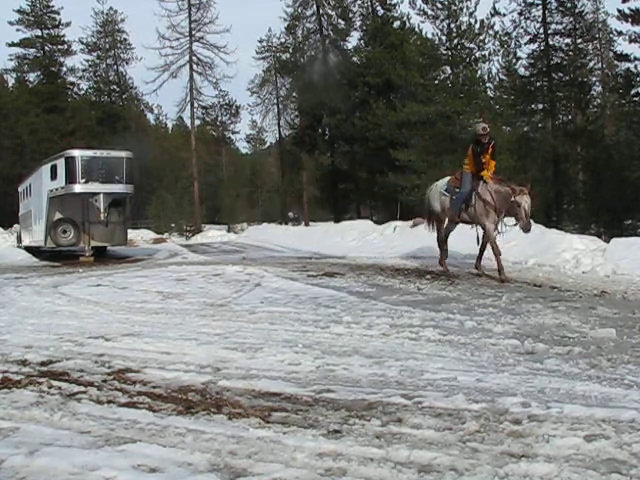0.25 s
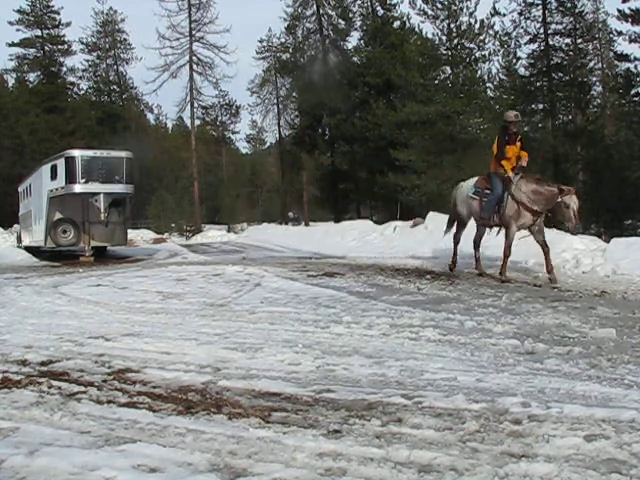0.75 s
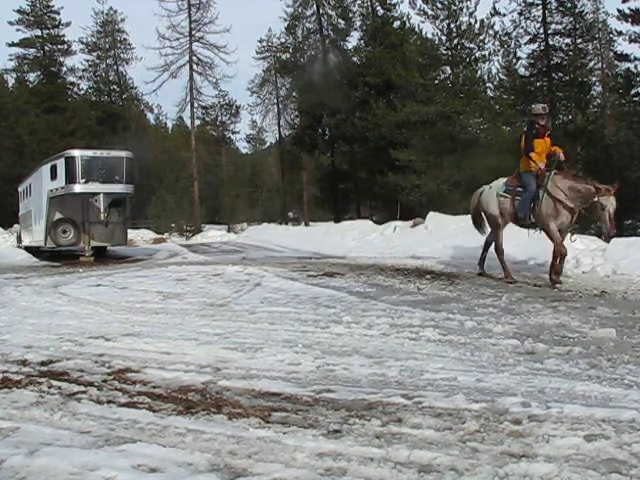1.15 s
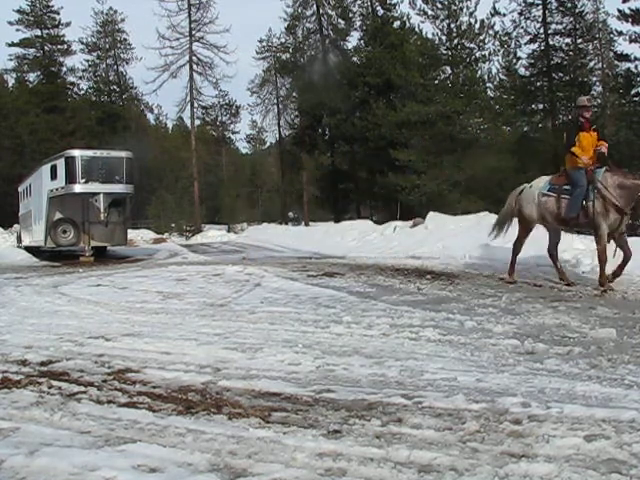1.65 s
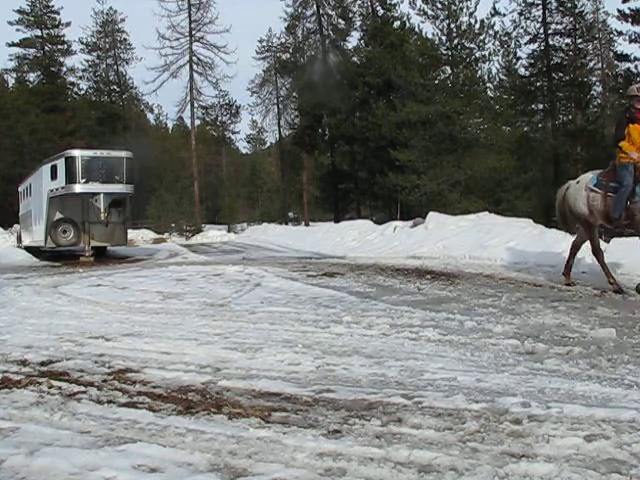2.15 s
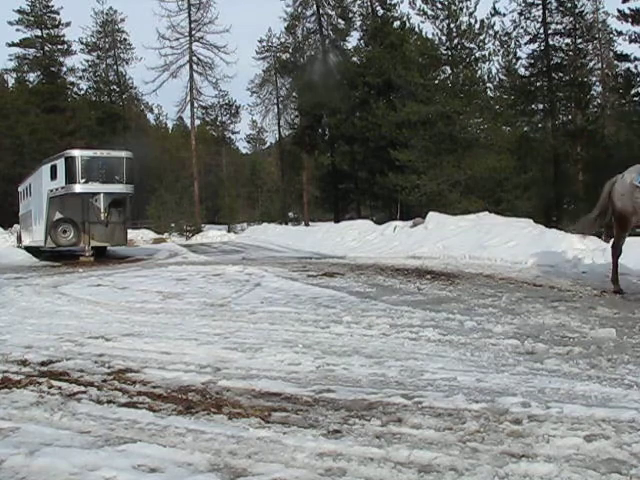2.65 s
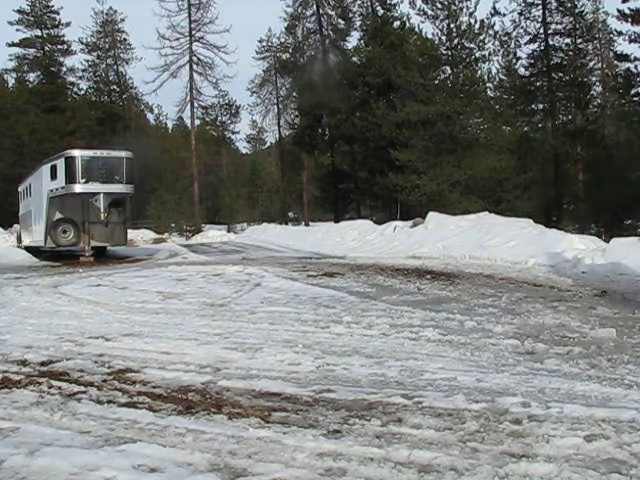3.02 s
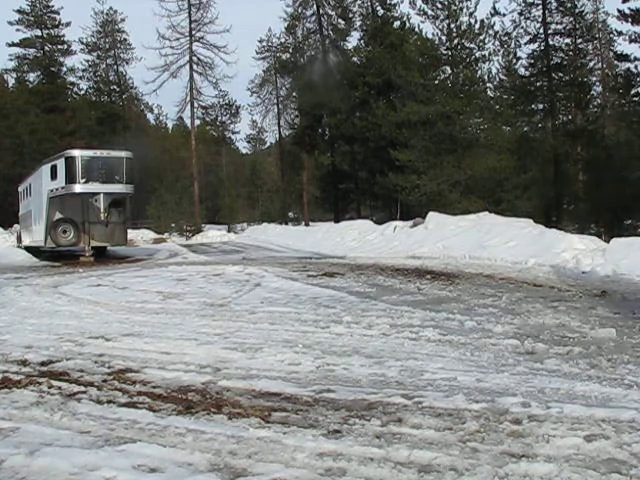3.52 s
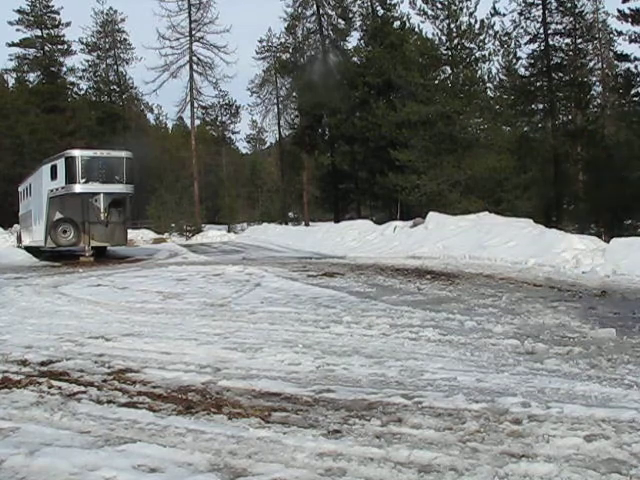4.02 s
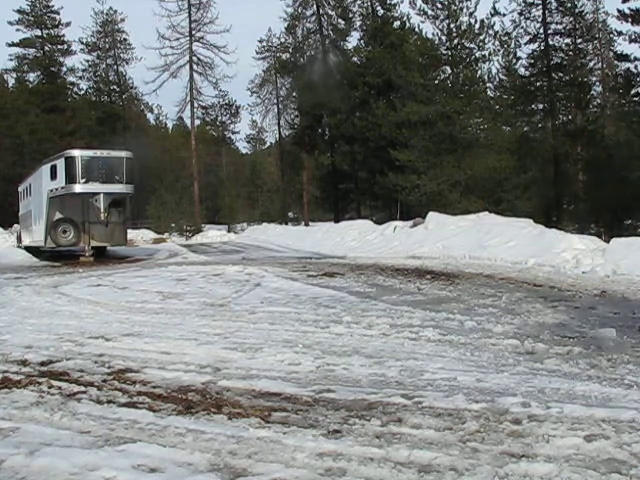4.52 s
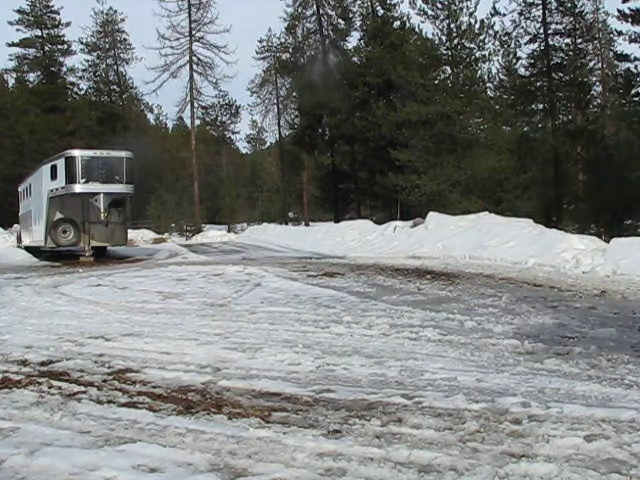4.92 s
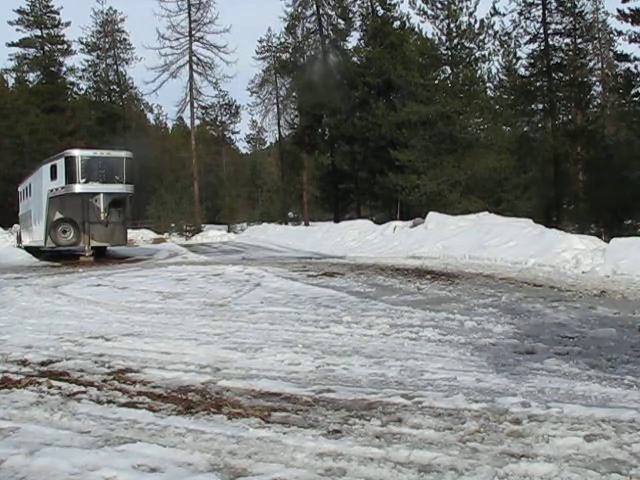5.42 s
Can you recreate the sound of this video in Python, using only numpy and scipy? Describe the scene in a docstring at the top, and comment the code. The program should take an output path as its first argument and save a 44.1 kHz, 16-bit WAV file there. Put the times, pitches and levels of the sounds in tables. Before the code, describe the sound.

A horse walks on icy, crusted snow in a forest clearing. A hard crack and knock open, another sharp one follows at once, then lighter crunches and sparse snaps. From the middle on, the steps grow denser and grainier, with hollow thuds under the crust and pattering ice chips. A stereo camera microphone hears them slightly to the right, dry with faint short echoes, over soft air hush.

```python
"""In a forest clearing, a horse walks over crusted, icy snow to the right of a camera.
Each step is built from shaped bands of breaking ice grains, ringing snaps of the crust, dull knocks
of the hoof and hollow drumming under the crust; chips of ice patter throughout.
Short decaying noise tails give the faint echoes of ruts, banks and trunks.
Behind it lie the hush of the open air and a low rumble, both of filtered noise."""
import sys
import numpy as np
from scipy import signal
from scipy.fft import rfft, irfft, next_fast_len
from scipy.io import wavfile
from scipy.ndimage import map_coordinates

SR = 44100
rng = np.random.default_rng(int(sys.argv[2]) if len(sys.argv) > 2 else 0)


def generate_wav(signal):
    """Clip the signal to [-1, 1] and save it as 16-bit WAV at the path in sys.argv[1]."""
    frames = np.transpose(np.atleast_2d(signal))
    scaled = np.clip(frames, -1, 1) * 32767
    pcm = np.round(scaled).astype(np.int16)
    wavfile.write(sys.argv[1], SR, pcm)


N = 250002

# colour of crackling ice grains, for crunch and chips: (pitch_hz, gain_db)
CRACKLE_COLOUR = [(1100, -10.5), (1700, -1), (3000, -3.5), (5000, -9.5), (6500, -9.5), (8500, -19.5)]


def amp(db):
    """Amplitude of a level in dB."""
    return 10 ** (np.asarray(db) / 20)


def unit(x):
    """x scaled to rms 1."""
    return x / np.sqrt(np.mean(x ** 2) + 1e-20)


def along(points, hz):
    """Read a curve of (Hz, value) points on a log frequency axis; -120 below the first point."""
    f, v = np.transpose(points)
    return np.interp(np.log(hz + 1), np.log(f + 1), v, -120, v[-1])


def coloured(x, points):
    """Pass x through the minimum-phase filter with the given (Hz, dB) gain, then set rms to 1."""
    m = 2 * next_fast_len(N // 2 + SR // 4)
    gain = amp(along(points, np.fft.rfftfreq(m, 1 / SR)))
    cepstrum = irfft(np.log(gain + 1e-6), m)
    # folding the cepstrum forward in time makes the filter causal
    cepstrum[1:m // 2] *= 2
    cepstrum[m // 2 + 1:] = 0
    filtered = irfft(rfft(x, m) * np.exp(rfft(cepstrum)), m)
    return unit(filtered[..., :N])


def highpass(x, order, hz):
    """Causal Butterworth high-pass."""
    return signal.sosfilt(signal.butter(order, hz, "high", fs=SR, output="sos"), x)


def add(out, s, rise_ms, wave):
    """Mix a wave into out under a short swell that peaks at s and dies in a few rise times."""
    rise = max(rise_ms, .1) / 1000 * SR
    u = np.arange(len(wave)) / rise
    start = round(s * SR - rise)
    shaped = wave * u * np.exp(1 - u)
    out[max(start, 0):start + len(wave)] += shaped[max(-start, 0):]


def ringing(modes, hz, detune_spread, t):
    """Sum the sine modes of a struck body, each slightly and randomly off its nominal pitch."""
    detune = rng.normal(0, detune_spread, len(modes))
    return sum(amp(db) * np.sin(2 * np.pi * hz * ratio * (1 + d) * t)
               for (ratio, db), d in zip(modes, detune))


def grains(per_s, spread_db):
    """Ice grains breaking at random moments: many small, a few large."""
    when, size, sign = rng.random((3, N))
    size_db = np.minimum(-spread_db * np.log(1 - size), 13)
    return unit((when < per_s / SR) * amp(size_db) * np.sign(sign - .5))


def swell(t, rise_ms, fall_ms):
    """A rounded rise and fall of power about t = 0."""
    side_ms = np.where(t < 0, max(rise_ms, 1), max(fall_ms, 1))
    return np.exp(-2 * np.abs(1000 * t / side_ms) ** 1.53)


def slips(per_s, depth_db):
    """The snow gives way in fits and starts: a gain that wanders quickly."""
    knots = rng.standard_normal(int(N * per_s / SR) + 4)
    wander = map_coordinates(knots, [np.arange(N) * per_s / SR])
    return unit(amp(depth_db * wander))


def balance(db, weight_db, spray_db):
    """Power of thud, crush, crackle and spray; heavier weight deepens the mix."""
    # weight_db sets the crush relative to the crackle, and the thud follows it more steeply
    thud_db, thud_grows = -3.5, 1.4
    return amp(db + np.array([[thud_db + thud_grows * weight_db], [weight_db], [0], [spray_db]])) ** 2


def pressure():
    """How hard the hooves work the snow, as amplitude in four bands that slip partly together."""
    # hooves stamping down, sudden and then dying; weight and spray are relative to crackle:
    # (peak_s, crackle_db, fall_ms, weight_db, spray_db)
    stamps = [(0.002, -34, 3.7, 12.5, -31), (0.054, -41.5, 11, 5.5, 4), (0.187, -49, 21, -6, -1),
              (0.259, -22, 3.8, -3.5, -21), (0.455, -34.5, 5.4, -0.5, -1.5), (0.478, -42, 18, -1.5, 0),
              (0.938, -40.5, 14, 1, -1), (1.199, -39, 28, 0, -19), (1.474, -40, 6.4, -1.5, -10),
              (1.745, -39, 27, -11, 1), (1.961, -38, 11, -3.5, -2), (1.984, -47.5, 31, 4, -6),
              (2.039, -39, 23, -2, -16), (2.279, -35, 5, -25, 6.5), (2.327, -32.5, 26, -8, 0.5),
              (2.391, -38, 23, -9.5, 1), (2.419, -30.5, 83, -6, 1), (2.537, -30, 13, -2.5, -4),
              (2.817, -27, 6.8, -3, -21), (2.999, -27, 28, -3.5, 3), (3.376, -28, 5.9, -6, -6),
              (3.435, -40, 7.8, -0.5, -16), (3.552, -31, 48, -5, 2.5), (3.772, -41.5, 16, -6, 6),
              (3.79, -29.5, 43, -4.5, 1), (4.031, -27.5, 58, -5, 2.5), (4.291, -29, 14, -8, 1),
              (4.347, -31.5, 27, 0.5, 2), (4.545, -39, 38, -4.5, -20), (4.644, -39, 25, -10, 5.8),
              (4.778, -36.5, 48, -1, -3.5), (4.878, -28.5, 92, -3, -5), (4.898, -24.5, 13, 3, -3),
              (5.123, -33.5, 16, -6, -3.5), (5.289, -33, 11, -3, -0.5), (5.336, -35, 35, 3.5, -22)]
    # hooves sinking or dragging, swelling and fading; half length is the mean of rise and fall:
    # (peak_s, crackle_db, half_length_ms, weight_db, spray_db)
    drags = [(0.026, -71, 16, 6, -27), (0.286, -32.5, 21, -3.5, 1.5), (0.373, -52.5, 27, -3, 0),
             (0.59, -40, 32, -6.5, 1), (0.665, -56, 19, -14, 6.5), (0.73, -41, 17, -20, 2.5),
             (0.839, -36.5, 26.4, -4.5, -1), (0.999, -51, 12, 2.5, 4), (1.146, -33.5, 22.4, -9.5, 3.5),
             (1.192, -34.5, 10.4, -7, -1), (1.393, -31, 27.5, -8, 0), (1.523, -42.5, 16, -1.5, -3),
             (1.644, -34, 17.4, -7.5, -4), (1.69, -44.5, 26, -3, 2.5), (1.827, -38, 27, -20, 4),
             (1.904, -34.5, 23.5, -5.5, 3), (2.164, -42.5, 9.8, -14, 2), (2.21, -34.5, 20, -7, 1),
             (2.5, -34.5, 46, -5, -1), (2.562, -33.5, 15.5, -1, -6), (2.731, -34.5, 32, -8, -1),
             (2.904, -42.5, 31, -22, 1.5), (3.065, -36, 33, -4, 0.5), (3.178, -37.5, 28, -5.5, -8),
             (3.302, -29, 34, -11, -9.5), (3.663, -36, 17, -1, -25), (3.712, -31, 25, -1.5, -28),
             (3.866, -29.5, 25, -6, -24), (3.936, -41.5, 50, -10, -20), (4.003, -33.5, 29, -17, 1),
             (4.085, -31.5, 54, -3, -10), (4.17, -40.5, 50, 2, -25), (4.421, -42.5, 65, -1.5, -25),
             (4.504, -36.5, 16, -7, -5), (4.665, -34, 17, -4, -3), (4.709, -38, 13.4, -0.5, -3),
             (4.825, -37.5, 37, -1, -8), (5.144, -37.5, 10.6, -2.5, -4), (5.229, -29, 17.5, -6.5, 3.5),
             (5.44, -34.5, 13.7, -4.5, 1), (5.516, -33.5, 18.3, -11, -4.5), (5.65, -44, 35, -7, -8)]
    # faint rustle of snow, heard between the steps: (time_s, crackle_db)
    rustle = [(0, -77), (0.9, -56), (1.1, -64), (1.28, -50.5), (1.9, -54), (2.1, -53.5), (2.63, -50),
              (2.95, -58), (3.35, -46), (3.5, -53), (4.3, -43.5), (4.6, -55), (5.05, -52), (5.3, -52.5),
              (5.67, -51.5)]
    stamp_rise_ms, settle_db, settle_ms = 3, -20.5, 39  # loosened snow settles after each stamp
    lingers = np.sqrt(1.13)  # a drag falls a little more slowly than it rises

    t = np.arange(-SR // 4, SR // 2) / SR
    rustle_db = np.interp(np.arange(N) / SR, *np.transpose(rustle))
    power = balance(rustle_db, weight_db=-3.5, spray_db=0.5)
    swells = [(s, db, stamp_rise_ms, ms, *mix) for s, db, ms, *mix in stamps]
    swells += [(s, db + settle_db, stamp_rise_ms, ms + settle_ms, *mix) for s, db, ms, *mix in stamps]
    swells += [(s, db, ms / lingers, ms * lingers, *mix) for s, db, ms, *mix in drags]
    for s, db, rise_ms, fall_ms, weight_db, spray_db in swells:
        at = np.arange(len(t)) + round(s * SR) - SR // 4
        inside = (at >= 0) & (at < N)
        power[:, at[inside]] += balance(db, weight_db, spray_db) * swell(t, rise_ms, fall_ms)[inside]
    together = slips(per_s=45, depth_db=1.66)
    return np.array([together * np.sqrt(p) * slips(per_s=76, depth_db=1.5) for p in power])


def crunches(levels):
    """The same breaking grains sound in all four bands, on a bed of grains too fine to tell apart."""
    # low thump of the packed snow: (pitch_hz, gain_db)
    thud_colour = [(50, -58), (110, -6.5), (250, 1.5), (420, 3), (600, -22)]
    # grainy snow crushed under the hoof: (pitch_hz, gain_db)
    crush_colour = [(300, -2.5), (500, 8), (900, 8), (1400, 3.5), (2000, -37.5)]
    # fine spray kicked up: (pitch_hz, gain_db)
    spray_colour = [(2500, -29.5), (4500, -0.5), (7000, 6.5), (10000, 2.5), (13000, 4), (16000, -3.5)]

    coarse = grains(per_s=600, spread_db=4.0)
    fine = grains(per_s=5000, spread_db=2.5)
    # colour, then shares of coarse and fine grains
    mixes = [(thud_colour, .9, .4), (crush_colour, .8, .5), (CRACKLE_COLOUR, .6, .8), (spray_colour, .3, .9)]
    bands = []
    for colour, coarse_share, fine_share in mixes:
        bed = 0.5 * rng.standard_normal(N)
        bands.append(coloured(coarse_share * coarse + fine_share * fine + bed, colour))
    return np.sum(levels * bands, axis=0)


def cracks():
    """A snap rings the ice plate for a few cycles, with a bright tick at the break."""
    # the ice crust snapping; level_db sets the ring before its modes sum: (peak_s, level_db, pitch_hz)
    snaps = [(0.0015, -2.5, 1410), (0.0234, -17, 1120), (0.0272, -16, 1100), (0.0589, -19, 1360),
             (0.134, -34.5, 1150), (0.1496, -30, 1220), (0.186, -25, 3830), (0.2595, -1.5, 1830),
             (0.2606, -5, 1680), (0.32, -30, 1480), (0.514, -32.5, 1150), (0.685, -38, 4500),
             (0.701, -31, 2440), (0.7375, -21, 2610), (0.8283, -22, 2000), (1.1023, -21, 3900),
             (1.1874, -11.5, 5230), (1.2015, -3, 2620), (1.4722, -27, 2880), (1.7479, -22.5, 3050),
             (1.85, -25, 5730), (2.038, -21, 1720), (2.2063, -11, 1950), (2.2246, -18.5, 5500),
             (2.2792, -18.5, 3700), (2.305, -18, 5400), (2.328, -1.5, 2990), (2.333, -18.5, 2240),
             (2.3943, -20, 3140), (2.4151, -8, 2860), (2.4253, -20, 3270), (2.451, -20, 2460),
             (2.5365, -17, 2540), (2.787, -29, 2980), (2.9003, -22, 3350), (3.0021, -8.5, 2280),
             (3.0097, -8, 3040), (3.4327, -28, 3140), (3.6944, -17, 1600), (3.7021, -16, 1480),
             (3.7128, -17.5, 1760), (3.7896, -33, 2920), (3.8474, -15, 2600), (4.3475, -21, 2250),
             (4.4195, -24, 2210), (4.7124, -28, 2000), (4.8773, -7.5, 2460), (4.879, -6, 5040),
             (4.891, -13, 2600), (4.8968, -11, 1750), (5.1761, -30, 2150), (5.2257, -6.5, 2120),
             (5.3351, -16.5, 1580), (5.358, -30, 1290), (5.503, -20.5, 2740)]
    # modes of a breaking ice plate: (pitch_ratio, gain_db)
    plate_modes = [(0.622, -7.5), (0.998, -0.5), (1.45, -7.5), (2.2, -15)]
    snap_cycles = 0.75  # rise time, in cycles of the plate
    # tick level for a 0 dB snap at 2 kHz; thinner plates tick brighter; share of the snap's dB
    tick_base_db, tick_db_per_octave, tick_grows = -30.5, 13.5, 0.44

    out, t = np.zeros(N + SR), np.arange(SR // 20) / SR
    for s, db, hz in snaps:
        ring = ringing(plate_modes, hz, 0.079, t)
        tick = np.diff(rng.standard_normal(len(t) + 2), 2)  # differencing twice brightens the noise
        tick_db = tick_base_db + tick_db_per_octave * np.log2(hz / 2000) + tick_grows * db
        add(out, s, 1000 * snap_cycles / hz, .8 * amp(db) * ring + amp(tick_db) * tick)
    return out[:N]


def knocks():
    """A dull blow: a cycle or two of damped modes; the deeper the knock, the more the ground answers."""
    # the hoof's weight on hard ground and hollow crust: (peak_s, level_db, pitch_hz)
    blows = [(0.0014, -1.5, 856), (0.0214, -12, 790), (0.0261, -21, 810), (0.26, -9.5, 777),
             (0.2804, -21, 695), (0.454, -26, 452), (1.2027, -7.5, 377), (1.2253, -23, 430),
             (1.4013, -26, 590), (1.4717, -26, 680), (1.9851, -25, 478), (2.3924, -21.5, 530),
             (2.427, -29, 536), (2.4498, -17, 520), (2.457, -23, 483), (2.5361, -19, 547),
             (2.7458, -19.5, 290), (2.8162, -13.5, 366), (2.8388, -23.5, 363), (2.9976, -13, 330),
             (3.0026, -12, 352), (3.0119, -16.5, 310), (3.0215, -18.5, 418), (3.2835, -19.5, 860),
             (3.5567, -24, 455), (3.7029, -14, 650), (3.712, -24.5, 364), (3.7896, -20, 418),
             (3.82, -21.5, 430), (4.0306, -11.5, 800), (4.2984, -14.5, 533), (4.3699, -29.5, 495),
             (4.778, -28, 575), (4.8774, -28, 724), (4.9005, -10.5, 484), (4.9243, -22, 530),
             (5.224, -21, 560), (5.3344, -12, 370), (5.565, -31.5, 347)]
    # modes of the crust under a hoof: (pitch_ratio, gain_db)
    ground_modes = [(1.001, -1.5), (1.7, -17)]
    earth_hz = 175  # the frozen ground below
    rise_ms, rings_longer = 0.82, 0.57  # rise at 500 Hz; higher, hollower crust rings on a little longer

    out, t = np.zeros(N + SR), np.arange(SR // 10) / SR
    for s, db, hz in blows:
        ring = ringing(ground_modes, hz, 0.05, t)
        add(out, s, rise_ms * (hz / 500) ** rings_longer, amp(db) * ring)
        # the earth answers just after, in opposite polarity
        earth = -amp(db - 11.5) * (earth_hz / hz) ** 2 * np.sin(2 * np.pi * earth_hz * t)
        add(out, s + 0.0028, 2.2, earth)
    return highpass(out[:N], 2, 80)


def hollows():
    """Breaking grains drum on an air pocket under the crust, which resonates at its own pitch."""
    # pockets drumming while the hoof works them: (peak_s, level_db, pitch_hz, width_hz, rise_ms, fall_ms)
    pockets = [(0.03, -45, 1030, 600, 7.9, 130), (0.3, -48, 1000, 700, 10, 160),
               (1.215, -39, 415, 200, 5, 48), (2.452, -30, 495, 80, 40, 36), (2.83, -39, 430, 120, 5, 39),
               (3.01, -33, 330, 120, 5, 80), (3.95, -41.5, 300, 60, 40, 24), (3.71, -37, 800, 500, 15, 24),
               (4.04, -33, 755, 300, 8, 60), (4.92, -34, 800, 500, 25, 50), (4.3, -36, 500, 200, 14, 43),
               (4.67, -40, 1000, 250, 15, 38)]
    out, t, drum = np.zeros(N), np.arange(N) / SR, grains(per_s=900, spread_db=3)
    for s, db, hz, width_hz, rise_ms, fall_ms in pockets:
        rung = signal.lfilter(*signal.iirpeak(hz, hz / width_hz, SR), drum)
        out += amp(db) * np.sqrt(swell(t - s, rise_ms, fall_ms)) * unit(rung)
    return out


def chips():
    """Kicked-up bits of ice skitter and land: sparse random grains throughout, in crackle colour."""
    bits = grains(per_s=60, spread_db=7)
    return amp(-63) * coloured(bits, CRACKLE_COLOUR + [(9000, -14), (16000, -18)])


def distance(x):
    """The air takes the finest treble from the far steps."""
    # air loss above 11 kHz, strongest at the start: (time_s, gain_db)
    far_treble = [(0, -12), (1.5, -1), (4, -4), (5.3, -1.5)]
    treble = signal.sosfiltfilt(signal.butter(3, 11000, "high", fs=SR, output="sos"), x)
    gain = amp(np.interp(np.arange(N) / SR, *np.transpose(far_treble)))
    return x + (gain - 1) * treble


def ports(x):
    """Sound from the right reaches the left port later, weaker and duller."""
    # bearing of the horse, as heard at the left port: (time_s, lag_us, level_db)
    bearing = [(0, 31.4, -0.5), (1.5, 39.5, -1), (2.8, 60, -1), (4.5, 73.3, -1.5), (5.67, 75, -1.5)]
    # shadow of the camera body on the left port: (pitch_hz, gain_db)
    shadow = [(100, 0), (700, -2), (2500, -2.74), (8000, -3), (15000, -8.5)]
    hz, t, z = signal.stft(x, SR, nperseg=512)
    s, lag_us, db = np.transpose(bearing)
    late = np.exp(-2j * np.pi * hz[:, None] * np.interp(t, s, lag_us) * 1e-6)
    shade = amp(np.interp(t, s, db) + along(shadow, np.maximum(hz, 100))[:, None])
    left = signal.istft(z * late * shade, SR, nperseg=512)[1][:N]
    return np.array([left, x])


def clearing(x, count=60):
    """Scattered echoes off ruts, banks and trunks: different at each port, and new as the horse moves on."""
    # how long the echoes take to fall by 60 dB: (pitch_hz, decay_s)
    echo_decay = [(200, 0.17), (2000, 0.041), (12000, 0.014)]
    out, step = np.zeros((2, N + SR)), -(-N // count)
    hz, t, z = signal.stft(rng.standard_normal((count, 2, SR // 6)), SR, nperseg=256)
    decay = amp(-60 * t / along(echo_decay, np.maximum(hz, 200))[:, None])
    tails = signal.istft(z * decay, SR, nperseg=256)[1]
    tails = tails / np.linalg.norm(tails, axis=-1, keepdims=True)
    tails = highpass(tails, 1, 2500)  # treble scatters most
    for k, tail in enumerate(tails):
        echo = signal.fftconvolve(x[None, k * step:(k + 1) * step], tail, axes=1)
        out[:, k * step:k * step + echo.shape[1]] += echo
    return out[:, :N]


def air():
    """The hush of the forest: noise from the horse's side, plus noise that differs at each port."""
    # colour of the open air: (pitch_hz, gain_db)
    air_colour = [(15, -48), (25, -3.5), (92, 11), (285, -3), (463, -3.5), (840, -4), (1610, -10.5),
                  (5000, -13.5), (6740, -12), (11000, -16.5), (16000, -34)]
    shared, left, right = coloured(rng.standard_normal((3, N)), air_colour)
    apart = highpass([left, right], 1, 350)
    return amp(-54) * (ports(shared) + 1.01 * apart)


def rumble():
    """A low rumble of filtered noise that rises and falls, partly different at each port."""
    # colour of the rumble: (pitch_hz, gain_db)
    rumble_colour = [(15, -30), (25, -3), (70, -3), (130, -1), (220, -28)]
    # the rumble's level over time, shared and separate parts alike: (time_s, level_db)
    rumble_level = [(0, -74), (2.2, -68), (2.8, -55), (4.2, -62), (4.8, -53.5), (5.67, -55)]
    shared, left, right = coloured(rng.standard_normal((3, N)), rumble_colour)
    level = amp(np.interp(np.arange(N) / SR, *np.transpose(rumble_level)))
    return level * (shared + 0.4 * np.array([left, right]))


def scene():
    """The hooves heard at two ports, with their echoes, over air and rumble."""
    levels = pressure()
    hooves = distance(crunches(levels) + cracks() + knocks() + chips() + hollows())
    # snow breaks over a wide patch, so the finer part of the crunch differs from port to port
    finer = signal.butter(1, [1500, 9000], "band", fs=SR, output="sos")
    patch = amp([[-12], [-8]]) * signal.sosfilt(finer, [crunches(levels), crunches(levels)])
    return ports(hooves) + patch + amp(-8) * clearing(hooves) + air() + rumble()


def record(dry):
    """The camera keeps nothing above its band limit."""
    top_hz = 15800
    m = next_fast_len(N + SR // 4)
    kept = np.fft.rfftfreq(m, 1 / SR) < top_hz
    return irfft(rfft(dry, m) * kept, m)[:, :N]


dry = scene()
out = record(dry)
generate_wav(out)
```